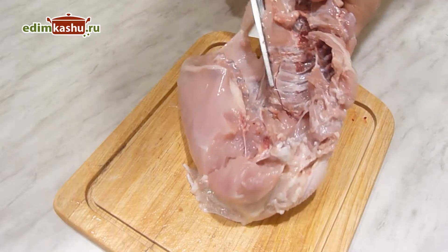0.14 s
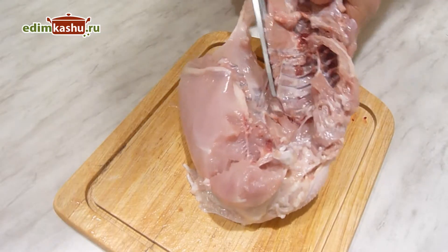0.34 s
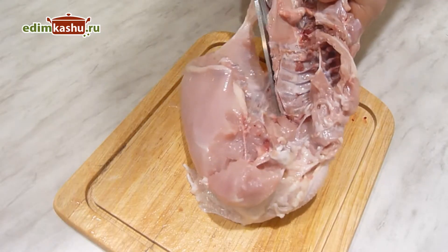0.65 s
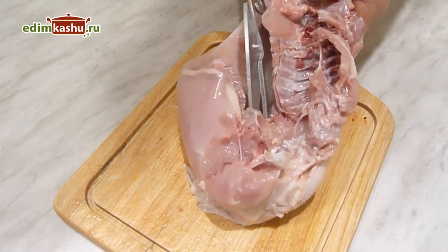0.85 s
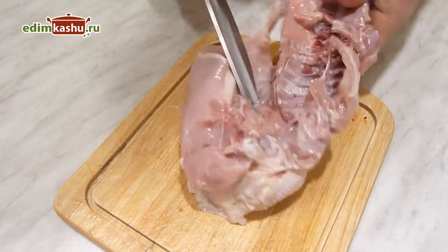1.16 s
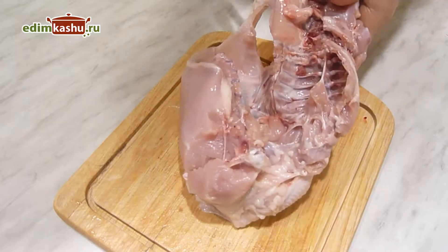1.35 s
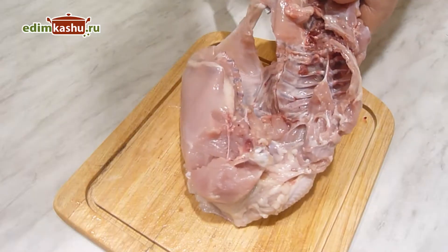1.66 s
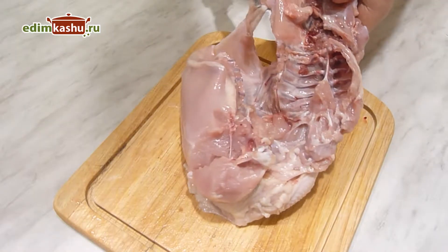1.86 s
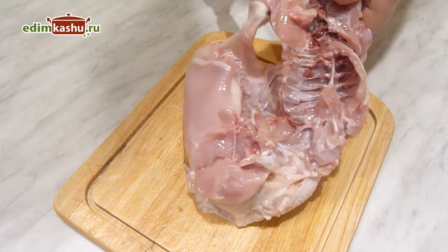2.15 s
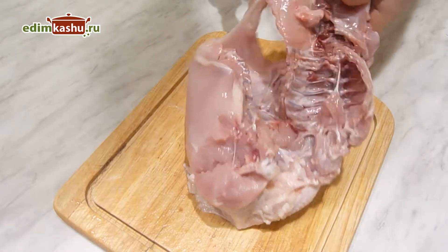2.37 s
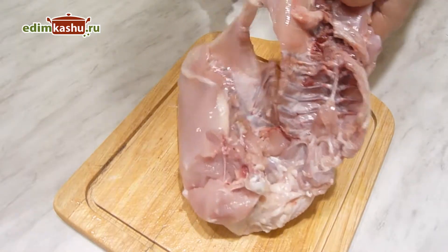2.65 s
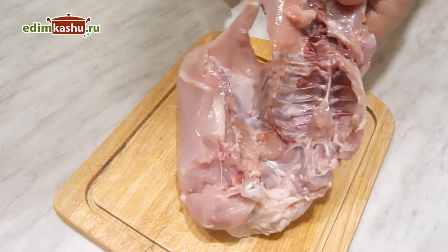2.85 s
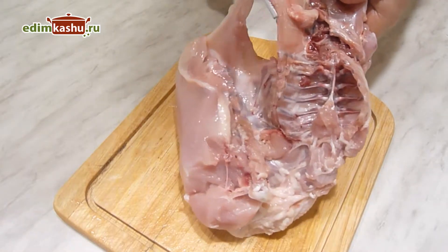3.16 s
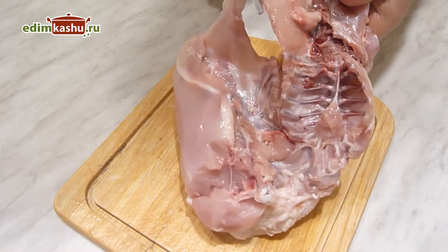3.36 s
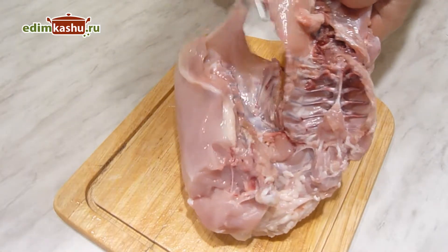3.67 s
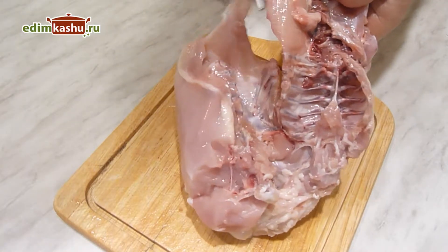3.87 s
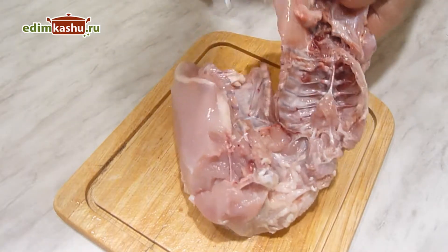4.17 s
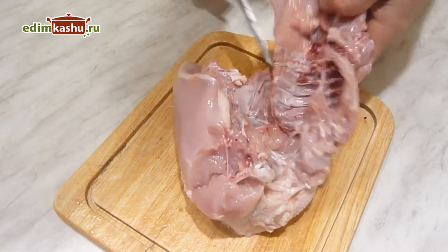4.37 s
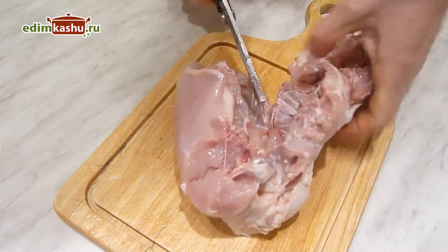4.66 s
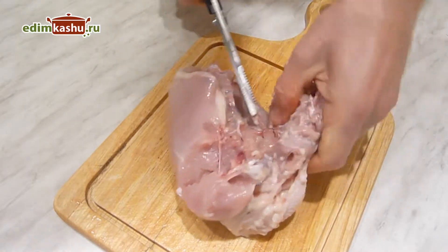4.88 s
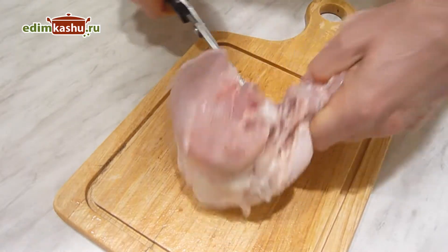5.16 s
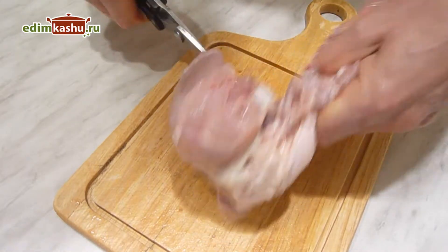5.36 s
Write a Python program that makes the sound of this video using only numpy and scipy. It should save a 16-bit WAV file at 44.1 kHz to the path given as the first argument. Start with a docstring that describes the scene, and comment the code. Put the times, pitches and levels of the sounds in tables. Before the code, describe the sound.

Kitchen scissors cut a raw chicken on a wooden board, heard close in a small, hard-surfaced kitchen. For the first half second the blades scrape and click lightly. At about 0.6 and 0.9 seconds they snap shut through ribs, each a loud, sharp crack with a brief, rough steel ring. Another strong, bright snip comes at 1.9 seconds. Faint ticks, rubs and the slide of reopening blades fill the gaps, with a small crack at 2.7 seconds. A softer snip at 3.5 seconds is followed by a loud one at 3.9. From about 4.4 seconds to the end, around 5.5, the bird is pulled apart: wet tissue crackles quietly, fibres and small bones pop, most clearly near 5.3 seconds, and meat slides dully on the wood. Each sound dies away in a short reverberation over quiet room noise with a faint hum.

```python
"""Kitchen scissors cut the ribs of a raw chicken on a wooden board, in a small hard kitchen.
First the blades scrape and click by stick-slip friction. Five times, from 0.6 to 3.9 s,
a rib fractures and the blades snap shut, ringing in their modes, then slide open. From 4.4 s the
bird is pulled apart: wet tissue crackles as films of juice burst, and small bones crack.
Each sound dies away in a short reverberation, over quiet room noise."""
import sys
import numpy as np
from scipy import signal
from scipy.fft import rfft, irfft
from scipy.io import wavfile
from scipy.ndimage import uniform_filter1d, minimum_filter1d

SR = 44100
rng = np.random.default_rng(int(sys.argv[2]) if len(sys.argv) > 2 else 0)


def wav_record(signal):
    """Record a signal, one row per channel, as 16-bit PCM in the file named by sys.argv[1]."""
    frames = np.transpose(np.atleast_2d(signal))
    bounded = np.clip(frames, -1, 1)
    # unit amplitude maps onto the largest positive 16-bit level
    quanta = np.round(bounded * 32767).astype(np.int16)
    wavfile.write(sys.argv[1], SR, quanta)


N = 243414
TIME = np.arange(N) / SR
HZ = np.fft.rfftfreq(4096, 1 / SR)
BAND_LIMIT_HZ = 7700


# Cuts through a rib: t/s, level/dB, break time/s, bass/dB, thud/dB, body/dB, brightness/dB,
# low mode f/Hz, high mode f/Hz, relative ring level/dB, reopening level/dB
RIB_CUTS = [(0.597, -5.5, 0.0027, -15.5, -22.5, -14.5, -7.5, 2240, 4100, -23, -47.5),
            (0.9266, -7.5, 0.0027, -33.5, -31.5, -9.5, -7, 2220, 3740, -11.5, -50.5),
            (1.933, -4.5, 0.0026, -47, -21, -4.5, 0.5, 1756, 4290, -19, -58),
            (3.515, -19, 0.0025, -50, -30, -7, -0.5, 1980, 4600, -6.5, -63.5),
            (3.9106, -8, 0.0028, -22, -25.5, -8.5, -2, 2370, 4330, -24.5, -48.5)]
# Modes of the steel blades: f/Hz, width/Hz, gain/dB
STEEL_MODES = [(710, 800, 7), (1360, 110, 3), (2140, 510, 6), (3065, 180, 0.5), (3790, 250, 5.5),
               (4400, 366, 10.5), (4960, 630, 7.5), (5690, 340, 6), (6150, 78, 7), (6850, 170, 5),
               (7540, 150, -2.5)]

def snips(ring_t60=0.1, pan_db=0.8):
    """Impact excitation: the rib gives way, the blades slam shut, thump the board and ring."""
    mix, t = np.zeros((2, N)), np.arange(SR // 2) / SR
    steel = sum(resonance(*mode) for mode in STEEL_MODES)
    for s, db, break_s, bass, thud, body, bright, low_hz, high_hz, ring_db, _ in RIB_CUTS:
        shape = curve([(20, bass - 10.5), (80, bass), (380, thud + 9.5), (850, thud + 4.5),
                       (1200, body - 4), (1700, body), (2650, body - 0.5), (3500, -2),
                       (5300, bright - 2), (7500, bright + 5.5)])
        # the point of contact decides which modes answer most
        shape += steel + resonance(low_hz, width_hz=310, db=5) + resonance(high_hz, width_hz=280, db=4)
        add(mix, s, impulse(release(break_s, shape), db), pan_db)
        # the blades chatter against each other, so the ring is rough
        chatter = rng.standard_normal(len(t)) * amp(-60 * t / ring_t60)
        ring = signal.fftconvolve(chatter, response(shape))
        add(mix, s, impulse(ring, db + ring_db), pan_db)
    return mix


def release(decay_s, shape_db, size=512):
    """Sudden release of stress: a break or a slip radiates a ragged burst that stops short."""
    t = np.arange(size) / SR
    stop = np.exp(-(t / (1.7 * decay_s)) ** 4)
    burst = rng.standard_normal(size) * np.exp(-t / decay_s) * stop
    for _ in range(4):  # flatten the spectrum, leaving only fine ripple
        spectrum = rfft(burst)
        power = uniform_filter1d(abs(spectrum) ** 2, size=9)
        burst = irfft(spectrum / np.sqrt(power + 1e-12)) * stop
    return signal.fftconvolve(burst, response(shape_db))


# Small bone cracks, wet ticks, and clicks of the blades catching and slipping during a stroke:
# t/s, level/dB, decay time/s, body/dB, brightness/dB, resonance f/Hz, resonance gain/dB
CRACKS_AND_TICKS = [(0.1077, -35, 0.009, -4, -5.5, 1030, 13.5), (0.1486, -42.5, 0.00087, 5, -5, 1290, 2),
                    (0.2167, -37, 0.0021, 6, -15, 5660, 16.5), (0.262, -30, 0.01, 7.5, -4, 1170, 1.5),
                    (0.2682, -29.5, 0.0011, 4.5, -5, 1790, -8), (0.427, -44.5, 0.0011, -6, -19, 1890, 8),
                    (0.5725, -36, 0.0052, 3, 0, 2300, 4), (0.5798, -27.5, 0.0016, 8, 4, 6140, 12),
                    (0.741, -42, .003, -0.5, -2, 6120, 12.5), (1.261, -44, 0.0029, -2, 8.5, 4470, 14),
                    (1.6094, -42.5, 0.00099, 5, 10, 4520, 14.5),
                    (1.6647, -42, 0.00095, 12.5, 9.5, 5710, 17.5), (1.92, -31.5, 0.0043, -12, 18, 5830, 5),
                    (2.2245, -52, 0.0012, -8.5, -2, 4680, 21), (2.366, -47.5, .0015, 0, 12.5, 4670, 9),
                    (2.6771, -24, 0.0019, -5, -5, 3260, 1), (3.401, -38.5, 0.011, 1, 6.5, 6010, 14),
                    (3.411, -36, 0.0045, -14, 1.5, 4600, 18), (3.893, -33.5, .0038, -3, -2, 5940, 9),
                    (4.155, -38, 0.0021, -28, -6.5, 3850, 22), (4.531, -35.5, 0.0029, -9, -37.5, 1450, 18),
                    (4.7647, -44, 0.0018, 0, -2.5, 1870, 11), (4.842, -37, 0.0014, -8.5, -11, 1690, 9.5),
                    (4.956, -37, 0.0038, -10, -2.5, 4180, 6), (5.0325, -33.5, 0.003, 4, 11, 5460, 18.5),
                    (5.1182, -37, .001, -7, -13, 3520, 7), (5.195, -36, 0.0044, -16, 12, 7200, 14),
                    (5.252, -26, 0.0037, 2, 7, 5250, 6.5), (5.4448, -42, 0.0085, 11.5, 0, 3720, 19),
                    (5.4682, -36.5, 0.00097, 19, 26, 7330, 10)]

def cracks_and_ticks(width_hz=760, blade_share=0.64, pan_db=-1.6):
    """Transient excitation: each crack, wet tick or blade slip is a burst with its own resonance."""
    mix = np.zeros((2, N))
    blades = sum(resonance(*mode) for mode in CONTACT_MODES)
    for s, db, decay_s, body, bright, hz, gain_db in CRACKS_AND_TICKS + fibres():
        shape = curve([(40, body - 43.5), (280, body - 17.5), (600, body - 2.5), (1200, body),
                       (2800, 0), (4400, bright / 3), (6500, bright), (7800, bright - 15)])
        shape += resonance(hz, width_hz, gain_db)
        if any(abs(s - loudest) < span / 2 for loudest, span, _ in blade_strokes()):
            shape += blade_share * blades  # stick-slip during a stroke excites the blade modes
        add(mix, s, impulse(release(decay_s, shape), db), pan_db)
    return mix


def fibres(count=10, from_s=4.85, to_s=5.2, low_hz=2660, high_hz=6160):
    """Progressive failure: fibres under tension give way one by one, as rows of random small breaks."""
    break_s, body_db, bright_db, gain_db = 0.0014, -6, 5, 11
    jitter, pitch = rng.random((count, 2)).T
    times = from_s + (to_s - from_s) * (np.arange(count) + jitter) / count
    levels = rng.normal(-42.5, 1, count)
    pitches = low_hz * (high_hz / low_hz) ** pitch
    return [(s, db, break_s, body_db, bright_db, hz, gain_db)
            for s, db, hz in zip(times, levels, pitches)]


# Strokes that do not get through: peak t/s, duration/s, level/dB
FAILED_CUTS = [(0.086, 0.083, -55.5), (0.235, 0.073, -45.5), (.38, 0.073, -49.5), (3.402, 0.083, -47)]

def blade_strokes(lead_s=0.011, close_s=0.057, close_db=-33.5, lag_s=0.18, open_s=0.076):
    """Sliding contact: the edges close into each snip, open after it, and slide in failed cuts."""
    closing = [(s - lead_s, close_s, db + close_db) for s, db, *_ in RIB_CUTS]
    opening = [(s + lag_s, open_s, db) for s, *_, db in RIB_CUTS]
    return closing + opening + FAILED_CUTS


# Modes of the blades pressed together: f/Hz, width/Hz, gain/dB
CONTACT_MODES = [(2330, 210, 15), (4620, 400, 6), (5430, 210, 9), (5880, 250, 12), (6570, 400, 8.5)]
# Spectrum of steel sliding on steel: f/Hz, level/dB
SCRAPE_SPECTRUM = [(40, -41), (120, -14.5), (400, -5.5), (1100, -1.5), (1700, -2), (3200, -4.5), (5000, 0),
                   (7500, -5)]

def scraping(gain_db=1):
    """Stick-slip friction: edge passes over edge in many tiny slips that excite the blade modes."""
    shape = curve(SCRAPE_SPECTRUM) + sum(resonance(*mode) for mode in CONTACT_MODES)
    slips = coloured(clicks(per_s=2100, spread_db=4.5), shape)
    return amp(gain_db) * slips * swells(blade_strokes(), depth_db=17.5, rise_share=0.6)


# Faint rubs: peak t/s, relative level/dB
HOLLOW_RUBS = [(0.101, -54), (1.16, -49.5), (3.715, -56.5), (4.235, -60.5), (5.02, -54)]
# Spectrum of a rub: f/Hz, level/dB
HOLLOW_SPECTRUM = [(40, -52.5), (300, -27), (900, -13.5), (1170, 0), (1400, -13.5), (4000, -20)]

def rubbing(length_s=0.071, gain_db=-1):
    """Friction noise: a single spectral peak makes each brief rub sound hollow."""
    rubs = [(s, length_s, db + gain_db) for s, db in HOLLOW_RUBS]
    hollow = coloured(rng.standard_normal(N), curve(HOLLOW_SPECTRUM))
    return hollow * swells(rubs, depth_db=11, rise_share=0.55)


# Meat sliding on the board: peak t/s, duration/s, level/dB
MEAT_DRAGS = [(.1, 0.14, -56.5), (.265, 0.15, -58.5), (.76, .09, -52.5), (4.62, 0.084, -52),
              (5.27, 0.35, -59.5)]
# Spectrum of meat on wood: f/Hz, level/dB
DRAG_SPECTRUM = [(40, -36.5), (100, -14.5), (170, -6.5), (500, 5.5), (1000, 0), (1600, -11), (4000, -25),
                 (8000, -36)]

def dragging():
    """Sliding friction: dense slips of meat on wood merge into a dull noise."""
    slips = coloured(clicks(per_s=2000, spread_db=2.5), curve(DRAG_SPECTRUM))
    return slips * swells(MEAT_DRAGS, depth_db=12, rise_share=0.45)


# Pulls on wet tissue: peak t/s, duration/s, relative level/dB
TISSUE_PULLS = [(4.425, 0.088, -55.5), (4.6, 0.041, -51.5), (5.09, 0.67, -52), (5.262, .1, -56.5),
                (5.485, 0.16, -56.5)]

def tearing(pops_db=-1, snaps_db=-5):
    """Rupture under tension: wet tissue crackles with pops and snaps during each pull."""
    pops = wet_pops(count=28, per_s=12, cycles=7, spread_db=3)
    snaps = coloured(clicks(per_s=110, spread_db=1.5), curve(WET_SPECTRUM))
    crackle = amp(pops_db) * pops + amp(snaps_db) * snaps
    return crackle * swells(TISSUE_PULLS, depth_db=16.5, rise_share=0.47)


# Spectrum of wet crackle: f/Hz, level/dB
WET_SPECTRUM = [(40, -48), (120, -27.5), (300, -8), (900, 3), (2000, -1.5), (3600, 1), (6000, 2),
                (7800, -4)]

def wet_pops(count, per_s, cycles, spread_db):
    """Damped oscillation: films of juice burst at `count` pitches, each about `per_s` times a second."""
    t, out = np.arange(800) / SR, np.zeros(N)
    for hz in np.linspace(1300, 7600, count):
        damped = np.sin(2 * np.pi * hz * t) * np.exp(-2 * hz * t / cycles)
        pop = unit(np.diff(damped))  # differencing removes the bass
        out += amp(curve(WET_SPECTRUM, hz)) * signal.oaconvolve(clicks(per_s, spread_db), pop)[:N]
    return unit(out)


def sticky_skin(level_db=-72):
    """Adhesion: wet skin held in the hand ticks faintly and sparsely throughout."""
    return amp(level_db) * wet_pops(count=20, per_s=0.56, cycles=8.6, spread_db=3.5)


# Reverberation time of the kitchen: f/Hz, T60/s
DECAY_TIMES = [(200, 0.13), (800, 0.19), (2000, 0.28), (4200, 0.27), (7500, 0.21)]
# Strength of its reflections: f/Hz, gain/dB
REFLECTION_GAINS = [(100, -11.5), (350, -4.5), (800, 1.5), (1500, 0.5), (5500, 0), (7600, 0.5)]

def kitchen(x, shared=0.53, first_s=0.0038, build_s=0.022, early_db=-2):
    """Reverberation: dense echoes from worktop, tiles and cupboards decay at each band's own rate."""
    own, common = rng.standard_normal((2, SR // 2)), rng.standard_normal(SR // 2)
    noise = np.sqrt(1 - shared) * own + np.sqrt(shared) * common
    hz, t, bands = signal.stft(noise, SR, nperseg=256)
    decay_db = -60 * t / curve(DECAY_TIMES, hz)[:, None]
    build_db = early_db * np.exp(-t / build_s)
    bands *= amp(decay_db + build_db + curve(REFLECTION_GAINS, hz)[:, None])
    tail = signal.istft(bands, SR, nperseg=256)[1]
    tail *= np.arange(tail.shape[1]) > first_s * SR
    tail /= np.linalg.norm(tail, axis=1, keepdims=True)
    return signal.fftconvolve(x, tail, axes=1)[:, :N]


# Spectrum of the room noise: f/Hz, level/dB
ROOM_SPECTRUM = [(15, -103.5), (25, -66.5), (75, -39.5), (108, -26), (169, -21.5), (210, -10.5),
                 (254, -20.5), (287, -11.5), (323, -8.5), (497, -6.5), (971, -10), (1180, -9),
                 (1360, -14.5), (2410, -15.5), (7600, -23.5), (9880, -63.5), (16700, -120)]
# Its treble roll-off: f/Hz, gain/dB
ROLL_OFF = [(6200, 0.5), (7600, -7)]
# Its likeness between left and right: f/Hz, correlation/1
CORRELATION = [(60, 0.787), (130, 0.45), (280, 0.29), (500, -0.16), (1000, -0.52), (2000, -0.67),
               (4100, -0.52), (7500, -0.14)]
# Tones of a faint hum: f/Hz, level/dB
HUM_TONES = [(285, -70), (500, -72.5)]

def room_noise(level_db=-51.5, patchy_db=2.02, phase_step_rad=0.0373):
    """Partial coherence: both channels share part of a noise with drifting patches; a hum wavers."""
    frames, hz = N // 256 + 5, np.fft.rfftfreq(1024, 1 / SR)
    a, b, c, d, patches = rng.standard_normal((5, frames, len(hz)))
    patches = uniform_filter1d(patches, size=14, axis=0)  # smooth in time
    patches = unit(uniform_filter1d(patches, size=8, axis=1))  # and in frequency
    same = curve(CORRELATION, hz)
    left = a + 1j * b
    right = same * left + np.sqrt(1 - same ** 2) * (c + 1j * d)
    gain = amp(curve(ROOM_SPECTRUM, hz) + curve(ROLL_OFF, hz) + patchy_db * patches)
    bands = np.array([left, right]) * gain / np.sqrt(1 + same)
    noise = unit(signal.istft(bands.transpose(0, 2, 1), nperseg=1024, noverlap=768)[1][:, :N])
    hum = np.zeros(N)
    for f, db in HUM_TONES:
        drift = np.cumsum(rng.normal(0, phase_step_rad, N))
        hum += amp(db) * unit(np.sin(2 * np.pi * f * TIME + drift))
    low_cut = signal.butter(2, 95, "highpass", fs=SR, output="sos")
    return signal.sosfilt(low_cut, amp(level_db) * noise + hum)


def amp(db):
    """Amplitude ratio of a level in decibels."""
    return 10 ** (np.asarray(db) / 20)


def unit(x):
    """Normalisation to rms 1."""
    return x / np.sqrt(np.mean(x ** 2) + 1e-20)


def curve(points, hz=HZ):
    """Interpolation on a log-frequency axis."""
    f, value = np.transpose(points)
    return np.interp(np.log(hz + 1), np.log(f + 1), value)


def resonance(hz, width_hz, db):
    """Lorentzian peak on a decibel spectrum."""
    return db / (1 + (2 * (HZ - hz) / width_hz) ** 2)


def response(shape_db):
    """Minimum-phase impulse response of energy 1, rolled off above the band limit."""
    log_gain = np.log(amp(shape_db - np.clip((HZ - BAND_LIMIT_HZ) / 15, 0, 40)))
    mirrored = np.concatenate([log_gain, log_gain[-2:0:-1]])
    spectrum = np.exp(np.conj(signal.hilbert(mirrored)))[:len(HZ)]
    taps = irfft(spectrum)[:len(HZ)]
    return taps / np.linalg.norm(taps)


def coloured(x, shape_db):
    """Source and filter: x shaped by a spectrum, at rms 1."""
    return unit(signal.oaconvolve(x, response(shape_db))[:N])


def clicks(per_s, spread_db):
    """Poisson process: random impulses of uneven size."""
    size = amp(spread_db * np.minimum(rng.exponential(1, N), 3))
    return size * rng.choice([-1, 1], N) * (rng.random(N) < per_s / SR)


def swells(rows, depth_db, rise_share):
    """Exponential growth and decay of each movement about its loudest moment."""
    out = np.zeros(N)
    for s, length, db in rows:
        away = np.maximum((s - TIME) / rise_share, (TIME - s) / (1 - rise_share)) / length
        out += amp(db - depth_db * away) * (away < 1)
    return out


def impulse(x, db):
    """Equal energy: a transient is scaled to match 3 ms at the given level."""
    return x / np.linalg.norm(x) * amp(db) * np.sqrt(0.003 * SR)


def add(mix, s, sound, pan_db):
    """Amplitude panning: the sound enters at time s, with left exceeding right by pan_db."""
    part = mix[:, round(s * SR):][:, :len(sound)]
    part += amp([[pan_db / 2], [-pan_db / 2]]) * sound[:part.shape[1]]


def scene(transient_room_db=-9, handling_room_db=-4):
    """Superposition of direct sound, reverberation and room noise."""
    transients = snips() + cracks_and_ticks()
    handling = scraping() + rubbing() + dragging() + tearing() + sticky_skin()
    echo = kitchen(amp(transient_room_db) * transients + amp(handling_room_db) * handling)
    echo *= amp([[-0.8], [0.8]])  # leans to the right
    return transients + handling + echo + room_noise()


def record(dry, recovery_db_per_s=110):
    """Peak limiting: the gain drops at the loudest snips and swells back; then a steep low-pass."""
    peak_db = 20 * np.log10(abs(dry).max(0) + 1e-9)
    over_db = np.maximum(peak_db + 0.5, 0)  # ceiling at -0.5 dB
    held_db = -minimum_filter1d(-over_db, size=61)
    fall_db = TIME * recovery_db_per_s
    reduction_db = np.maximum.accumulate(held_db + fall_db) - fall_db
    limited = dry / amp(uniform_filter1d(reduction_db, size=61))
    low_pass = signal.firwin(241, BAND_LIMIT_HZ, window=("kaiser", 7), fs=SR)
    return signal.oaconvolve(limited, low_pass[None], "same", axes=1)


dry = scene()
out = record(dry)
wav_record(out)
```